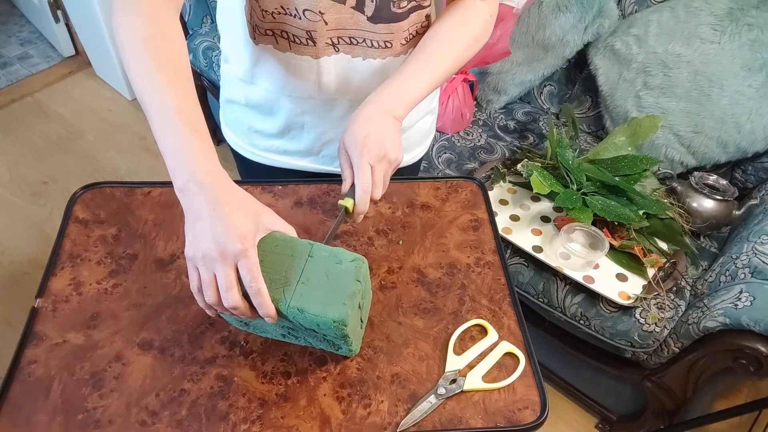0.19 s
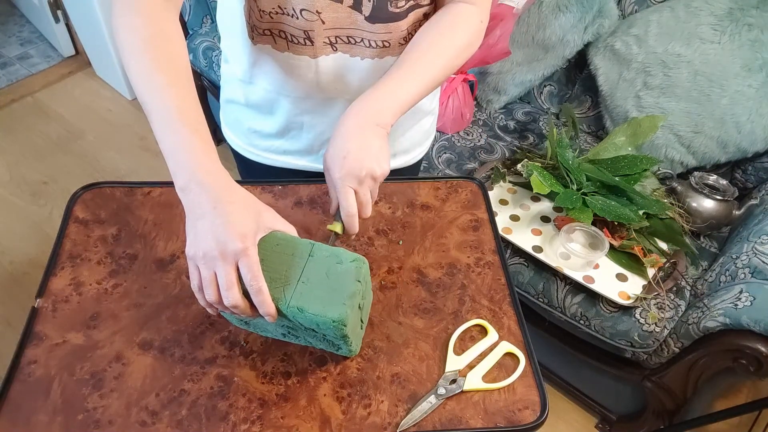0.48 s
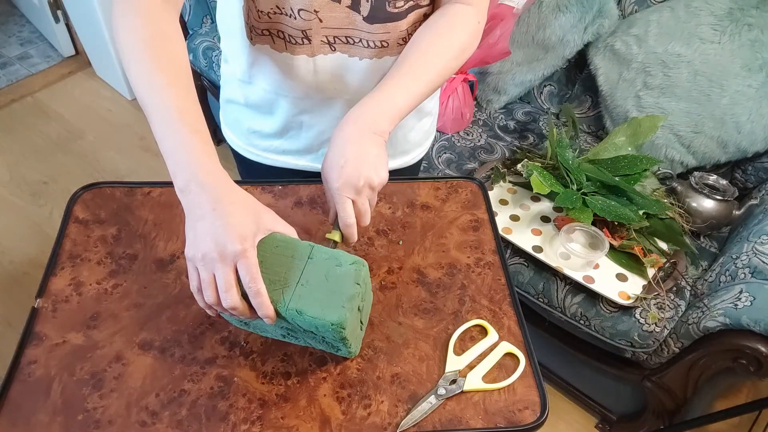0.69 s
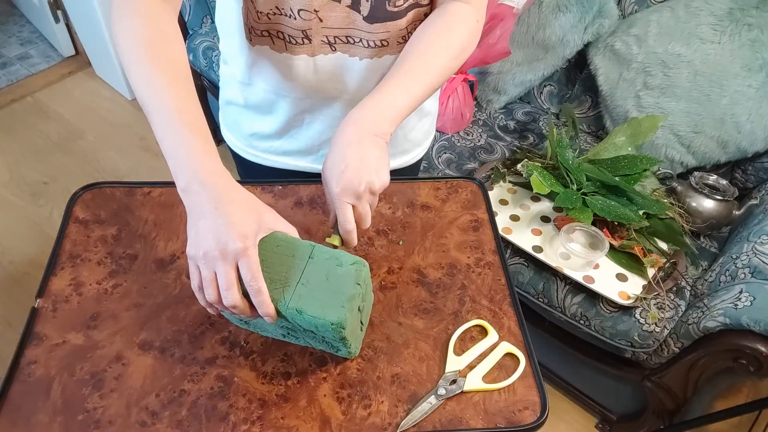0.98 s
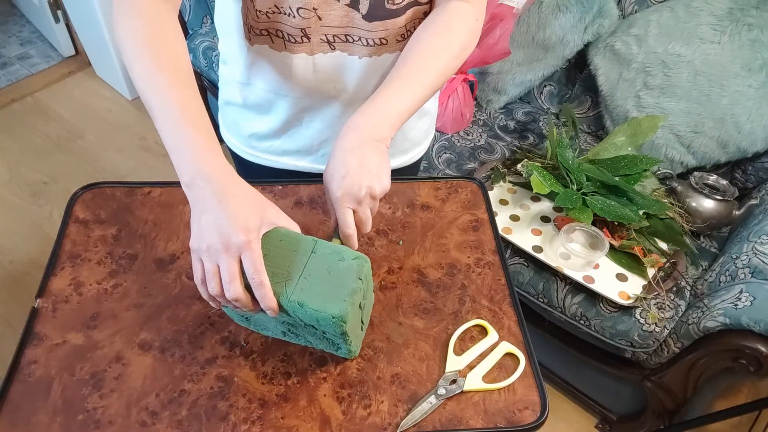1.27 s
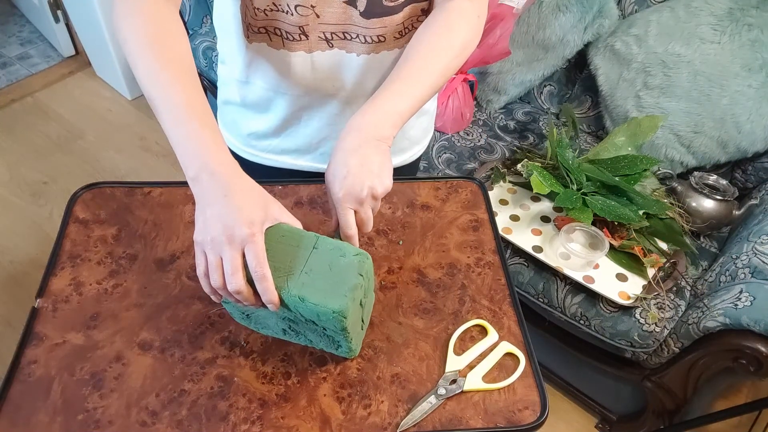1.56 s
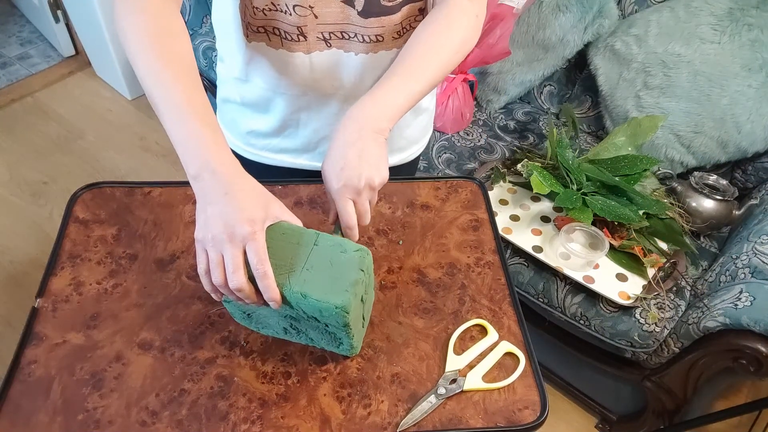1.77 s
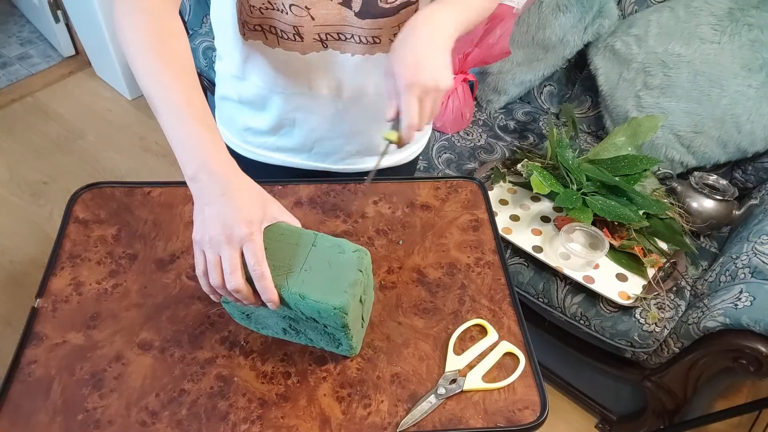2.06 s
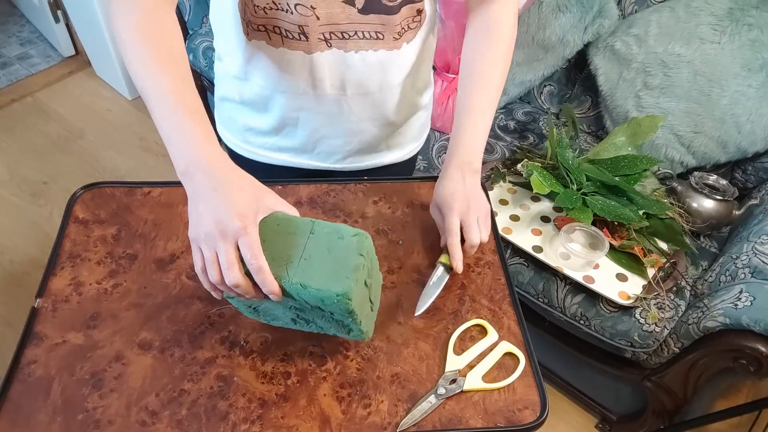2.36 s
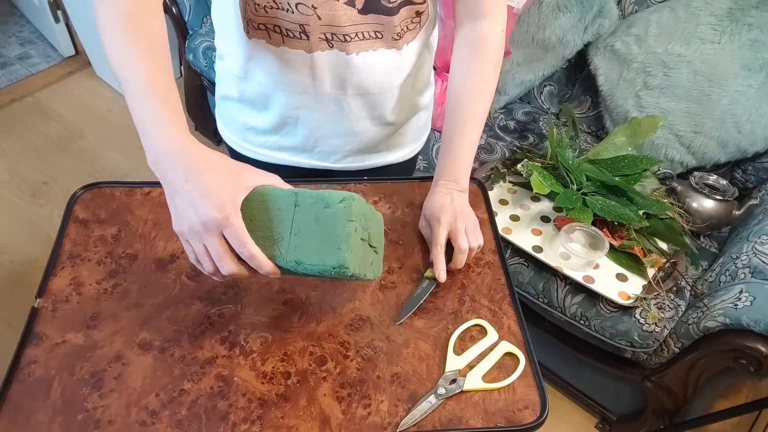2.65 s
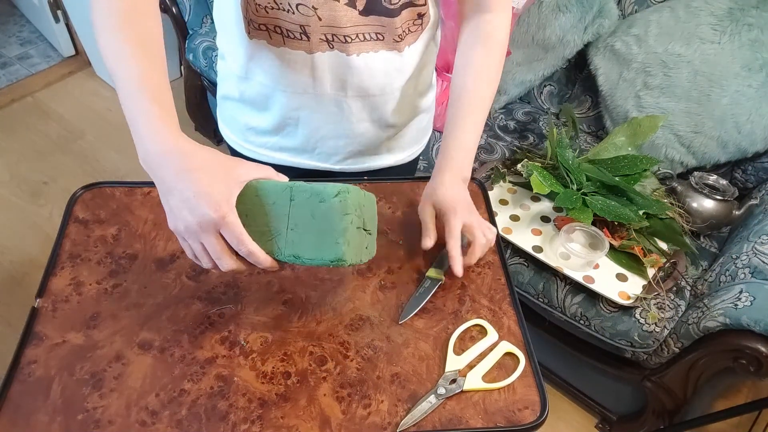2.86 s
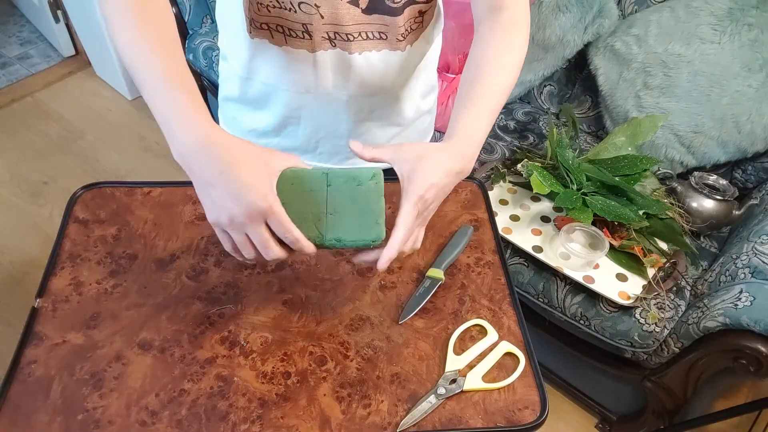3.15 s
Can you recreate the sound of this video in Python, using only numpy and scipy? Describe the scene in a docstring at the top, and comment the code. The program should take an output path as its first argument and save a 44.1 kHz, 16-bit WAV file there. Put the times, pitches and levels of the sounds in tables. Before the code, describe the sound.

Crisp, gritty rasping of a blade in brittle foam speeds up, ends in a hard crack on the table, then near quiet with soft bumps and a light brush, over low rumble and faint hiss indoors.

```python
"""Sawing dry foam

A knife saws through a dry foam block on a small table in a soft room, heard by a wide stereo microphone.
Brittle cells crush as dense random impulses; pressure drives resonances and rocking of the block. The blade
squeaks, breaks through and knocks the table, the knife is laid down and a finger brushes the foam: blows
excite decaying modes. A wall echo, a diffuse tail, low rumble and hiss surround the work."""
import sys
import numpy as np
from scipy import signal
from scipy.fft import rfft, irfft, next_fast_len
from scipy.io import wavfile
from scipy.ndimage import map_coordinates

SR = 44100
rng = np.random.default_rng(int(sys.argv[2]) if len(sys.argv) > 2 else 0)


def linear_from_db(decibels):
    """Turn decibels (scalar or array-like) into linear amplitude factors; 0 gives 1."""
    return 10 ** (np.asarray(decibels, float) / 20)


def bounce(signal):
    """Save signal as a 16-bit WAV file at the path given by the first command-line argument."""
    frames = np.transpose(np.atleast_2d(signal))
    limited = np.clip(frames, -1, 1)
    pcm = np.round(limited * 32767).astype(np.int16)
    wavfile.write(sys.argv[1], SR, pcm)


N = 145530  # samples
T = np.arange(N) / SR  # s

# Block rocking on the table: (frequency [Hz], bandwidth [Hz], relative level [dB])
ROCKING = [(267, 33, -9.5), (328, 24.3, -1.5), (365.6, 35, 1.5), (400, 29, 0), (432.7, 47, -3.5)]


def unit(x):
    """Normalization of mean power: the signal is brought to rms 1."""
    return x / np.sqrt(np.mean(x ** 2) + 1e-20)


def along(points, hz):
    """Interpolation of (frequency, value) points on a logarithmic frequency axis."""
    f, v = np.transpose(points)
    return np.interp(np.log(hz + 1), np.log(f + 1), v)


def wobble(rate):
    """Slow random modulation: a smooth curve through `rate` random knots a second."""
    knots = rng.standard_normal(int(N * rate / SR) + 4)
    return map_coordinates(knots, [T * rate])


def filtered(x, response):
    """Linear filtering: the spectrum is multiplied by a complex frequency response."""
    m = next_fast_len(x.shape[-1] + SR // 2)
    spectrum = rfft(x, m) * response(np.fft.rfftfreq(m, 1 / SR))
    return irfft(spectrum, m)[..., :x.shape[-1]]


def coloured(noise, points):
    """Spectral shaping of noise by (frequency, level) points."""
    return filtered(noise, lambda hz: linear_from_db(along(points, hz)))


def modes(peaks):
    """Superposition of damped resonators, alternating in sign, as one causal response."""
    def response(f):
        return sum((-1) ** k * linear_from_db(db) * 1j * f * width / (centre * centre - f * f + 1j * f * width)
                   for k, (centre, width, db) in enumerate(peaks))
    return response


def minimum_phase(points):
    """Minimum phase: folding the cepstrum gives a short causal impulse response of energy 1."""
    magnitude = linear_from_db(along(points, np.fft.rfftfreq(2048, 1 / SR)))
    cepstrum = irfft(np.log(magnitude + 1e-6))
    fold = np.r_[1, np.full(1023, 2), 1, np.zeros(1023)]
    h = irfft(np.exp(rfft(cepstrum * fold)))
    return h / np.linalg.norm(h)


def spread(pair, alike):
    """Interchannel coherence: two unrelated signals are mixed to a given left-right likeness."""
    def mid_side(hz):
        angle = np.arccos(np.clip(along(alike, hz), -1, 1)) / 2
        return np.array([np.cos(angle), np.sin(angle)])
    mid, side = filtered(pair, mid_side)
    return np.array([mid + side, mid - side])


def ports(x, lead):
    """Interchannel phase: one sound reaches both microphone ports, the left leading by lead(hz) radians."""
    return filtered(np.array([x, x]), lambda hz: np.exp(.5j * np.outer([1, -1], lead(hz))))


def cells():
    """Shot noise: foam cells burst at random moments with uneven sizes."""
    per_second, spread_db = 14000, 2.5
    hit = rng.random(N) < per_second / SR
    size = linear_from_db(spread_db * rng.exponential(size=N).clip(0, 3))
    return unit(hit * rng.standard_normal(N) * size)


def sawing():
    """Forced vibration: crushing cells rasp in the air and, under pressure, drive and rock the block."""
    # One list a stroke: (time [s], rasp level [dB], pressure into the table [dB])
    strokes = [
        [(0.0, -60.5, -7), (0.028, -61.5, -0.5), (0.274, -44, -19), (0.58, -46, -9), (0.65, -55.5, 14),
         (0.694, -52.5, -24), (0.745, -101, 17)],
        [(0.747, -45.5, 18), (0.751, -46.5, 2.5), (0.807, -42, -4.5), (0.867, -71, -8), (0.878, -57.5, 22.5)],
        [(0.8815, -35.5, 4.5), (0.887, -45.5, 2.5), (1.016, -45, 1.5), (1.048, -46.5, -1.5), (1.158, -51, 6),
         (1.216, -72, -36), (1.232, -71, 7)],
        [(1.2375, -37, 12.5), (1.246, -48.5, 1), (1.25, -35, 0.5), (1.262, -42, -8.5), (1.298, -47, 2.5),
         (1.415, -72, -13)],
        [(1.447, -55, 4), (1.458, -75, 4), (1.475, -55, 4), (1.513, -45, 8), (1.524, -64, -11)],
        [(1.548, -42.5, -11), (1.58, -49.5, -1.5), (1.762, -73, 14.5), (1.772, -63, -7)],
        [(1.775, -59, 2), (1.8, -53.5, 0), (1.825, -49.5, -23), (1.89, -53, -31), (1.955, -55, -33),
         (1.985, -54.5, -16), (2.021, -67, -27), (2.051, -73, -5), (2.09, -67, -1)],
        [(3.187, -52, -6), (3.191, -51, -33), (3.211, -64, -24), (3.22, -58, -8), (3.245, -76, -29),
         (3.271, -61, -25), (3.3, -85, -2)],
    ]
    # Colour of the crushed cells: (frequency [Hz], relative density [dB per Hz])
    rasp = [(120, -9.5), (200, -29), (358, -14), (446, -10), (743, -10), (925, -6.5), (1410, -1),
            (1690, -9), (1880, -3), (4430, -9.5), (5000, -7.5), (6100, -12.5), (7950, -7), (9030, -18),
            (13000, -8.5), (15600, -13.5)]
    # Resonances of the foam block: (frequency [Hz], bandwidth [Hz], relative level [dB])
    block = [(653, 117, 2.5), (1134, 460, -1.5), (1800, 410, 0.5), (2420, 210, -1), (2950, 490, -6)]
    block_db, block_follows = -1.5, 0.56  # dB over the rasp; dB per dB of pressure
    rock_db = -6.5  # dB over rasp plus pressure

    s, db, press = np.concatenate(strokes).T
    on = sum((T >= rows[0][0]) & (T < rows[-1][0]) for rows in strokes)
    level = np.interp(T, s, db)
    level = level + 1.27 * wobble(30.02) + 1.1 * wobble(70) + 0.93 * wobble(140)  # uneven cutting
    press = np.interp(T, s, press)

    def drive(db, response):
        reference = np.std(filtered(cells(), response))
        return filtered(cells() * on * linear_from_db(db), response) / reference

    def rocking(f):
        return modes(ROCKING)(f) * modes([(365, 250, 0)])(f)

    air = drive(level, lambda hz: linear_from_db(along(rasp, hz)))
    body = drive(level + block_db + block_follows * press, modes(block))
    return air + body + drive(level + rock_db + press, rocking)


def squeaks():
    """Narrow-band noise: brief rough whistles of the blade on the foam, under Gaussian envelopes."""
    # Whistles: (centre time [s], time from peak to 1/e [s], frequency [Hz], level [dB])
    whistles = [(0.245, 0.092, 1317, -56), (0.388, 0.07, 8000, -49.5), (0.406, 0.022, 6820, -52),
                (1.649, 0.0091, 1262, -45), (1.801, 0.0055, 1258, -47), (1.981, 0.015, 2050, -57.5),
                (2.44, 0.021, 1387, -68.5), (3.054, 0.047, 3190, -75)]
    width = .014  # bandwidth as a share of the pitch
    out = np.zeros(N)
    for s, half, hz, db in whistles:
        tone = unit(filtered(rng.standard_normal(N), modes([(hz, hz * width, 0)])))
        out += linear_from_db(db) * np.exp(-((T - s) / half) ** 2) * tone
    return out


def knocks(blows, rings):
    """Impact excitation: a chattering crack and decaying modes, low-passed by the blow's hardness."""
    # Colour of the crack: (frequency [Hz], relative density [dB per Hz])
    crack_colour = [(100, -22), (400, -12), (1000, -6), (3000, -3), (5500, -6), (8000, -4), (9500, -8),
                    (13000, 0), (16000, 0)]
    # One blow lands in a few contacts: (delay [s], relative level [dB])
    contacts = [(0, 0), (.0008, -2), (.0015, -3), (.0024, -6), (.004, -9)]
    vary_db, vary_phase = 1.5, .8  # spread of modes from blow to blow: dB, radians

    out, t = np.zeros(N + SR), T[:SR // 4]
    crack = minimum_phase(crack_colour)
    crack = crack / np.abs(crack).max()
    for s, db, hardness in blows:
        blow = np.zeros(len(t))
        for k, (f, width, peak) in enumerate(rings):
            louder, turn = rng.standard_normal(2)
            envelope = np.exp(-np.pi * width * t) - np.exp(-8 * f * t)  # decay less a fast onset
            ring = envelope * np.sin(2 * np.pi * f * t + vary_phase * turn)
            blow += (-1) ** k * linear_from_db(peak + vary_db * louder) * ring
        for k, (late, less) in enumerate(contacts):
            blow[round(late * SR):][:len(crack)] += (-1) ** k * linear_from_db(less) * crack
        blow = filtered(blow, lambda f: 1 / (1 + 1j * f / hardness) ** 2)
        out[round(s * SR):][:len(t)] += linear_from_db(db - 1.5) * blow
    return out[:N]


def nudges():
    """Transient excitation: decaying noise bursts, as soft shifts of the block, excite only its rocking."""
    # Soft contacts on the table: (time [s], relative level [dB])
    contacts = [(0.657, -59), (2.605, -50), (2.688, -43.5), (2.841, -41.5), (3.21, -47)]
    decay = 0.0046  # s, to 1/e
    push, t = np.zeros(N), T[:SR // 20]
    for s, db in contacts:
        burst = np.exp(-t / decay) * rng.standard_normal(len(t))
        push[round(s * SR):][:len(t)] += linear_from_db(db + 21.5) * burst
    return filtered(push, lambda f: modes(ROCKING)(f) * modes([(350, 200, 0)])(f))


def room(x):
    """Diffuse reverberation: each slice gets a fresh noise tail, each frequency decaying at its own speed."""
    # Reverberation time: (frequency [Hz], 60 dB decay time [s])
    decay = [(200, 0.3), (1000, 0.31), (4000, 0.27), (12000, 0.12)]
    # Coherence of the tail: (frequency [Hz], left-right likeness [-1 to 1])
    alike = [(60, 0.51), (180, 0.11), (550, -0.43), (1650, -0.55), (4970, -0.42), (15000, -0.47)]
    gap = round(.0015 * SR)  # 1.5 ms before the tail

    wet, step = np.zeros((2, N + 2 * SR)), SR // 10
    for i in range(0, N, step):
        hz, t, z = signal.stft(rng.standard_normal((2, SR // 2)), SR, nperseg=256)
        z = z * linear_from_db(-60 * t / along(decay, hz)[:, None])
        tail = signal.istft(z, SR, nperseg=256)[1]
        part = signal.fftconvolve(x[None, i:i + step], tail / np.linalg.norm(tail[0]), axes=1)
        wet[:, i + gap:][:, :part.shape[1]] += part
    return spread(wet[:, :N], alike)


def rumble():
    """Incoherent low-frequency noise: each port has its own rumble and slow level drift."""
    # Colour of the rumble: (frequency [Hz], relative density [dB per Hz])
    colour = [(2.4, -61), (4.0, 0), (22, -13.5), (30, -9.5), (38, -17), (76, -24.5), (134, -35),
              (250, -38.5), (320, -49), (550, -120)]
    level = np.array([[-40.5], [-43.5]])  # dB, left and right
    drift = 1.7 * np.array([wobble(3.05), wobble(3.28)])  # dB
    return unit(coloured(rng.standard_normal((2, N)), colour)) * linear_from_db(level + drift)


def hiss():
    """Partially coherent broadband noise: a nearly steady hiss."""
    # Colour of the hiss: (frequency [Hz], relative density [dB per Hz])
    colour = [(88, -32), (150, -5.5), (333, -6.5), (562, -14.5), (608, -16.5), (1610, -20.5), (1770, -27),
              (1950, -23), (6260, -37), (7900, -34.5), (8880, -45.5), (15600, -23)]
    # Coherence of the hiss: (frequency [Hz], left-right likeness, clipped to -1 to 1)
    alike = [(60, -1.5), (180, -1.11), (550, -0.6), (1650, -0.75), (4970, -0.076), (15000, -0.29)]
    noise = spread(coloured(rng.standard_normal((2, N)), colour), alike)
    return unit(noise) * linear_from_db(-56 + 0.27 * wobble(3.5))


def scene():
    """Superposition of paths: the work direct, knocks off one wall, all through the room, over the noise."""
    # Blade on block and table: (time [s], relative level [dB], low-pass hardness [Hz])
    blade_blows = [(.7495, -30, 2010), (.882, -29, 2490), (1.238, -30.5, 4000), (1.249, -26.5, 3000),
                   (1.419, -38, 3000), (1.4485, -32, 12000), (1.462, -34, 12000), (1.4745, -36, 12000),
                   (1.5357, -9.5, 15400), (1.800, -29.5, 710), (2.175, -52.5, 16200)]
    # Knife laid down: (time [s], relative level [dB], low-pass hardness [Hz])
    laid_blows = [(2.7579, -23, 5000), (2.7765, -27, 920)]
    # Table top, middle: (frequency [Hz], bandwidth [Hz], relative level [dB])
    table_middle = [(93, 72, -16), (244, 72, -20.5), (363, 44, -12.5), (540, 55, -14), (697, 170, -6),
                    (783, 62, -22.5), (865, 170, -14.5), (1054, 96, -5), (1337, 62, -9.5),
                    (1620, 240, -4.5), (2210, 390, -2.5), (3000, 880, 5.5), (5000, 1030, -3),
                    (7770, 620, -9)]
    # Table top, near the edge: (frequency [Hz], bandwidth [Hz], relative level [dB])
    table_edge = [(98, 41, -20.5), (230, 26, -16.5), (358, 22, -15.5), (593, 50, -3), (675, 55, -6.5),
                  (855, 107, -5), (1236, 180, -0.5), (1760, 250, 3.5), (2380, 260, -1), (2940, 400, -2),
                  (5000, 1600, -1), (6700, 730, -29)]
    # Phase of the direct rubbing sound: (frequency [Hz], lead of the left port [rad])
    rub_lead = [(100, 0.55), (350, 0.28), (1200, 1.94), (5800, 2.02), (8200, 4.35), (14000, 5.1)]
    # Balance of the ports: (frequency [Hz], left over right [dB])
    balance = [(60, 1), (250, 4.5), (1200, 0.5), (4500, 1), (6000, 5), (7200, 11.5), (8600, 5.5),
               (10500, 6), (15000, 2)]
    knock_lead, laid_lead = 0.00012, 0.000192  # s, the left port hears a blow first
    wall_delay, wall_db = 0.017, -13  # s, dB
    rub_room_db, knock_room_db = 3.5, 2

    rub = sawing() + squeaks() + nudges()
    struck = knocks(blade_blows, table_middle)
    laid = knocks(laid_blows, table_edge)
    direct_knocks = ports(struck, lambda hz: 2 * np.pi * hz * knock_lead)
    direct_knocks = direct_knocks + ports(laid, lambda hz: 2 * np.pi * hz * laid_lead)
    # the echo arrives with its sides swapped
    wall = linear_from_db(wall_db) * np.roll(direct_knocks[::-1], round(wall_delay * SR), axis=1)
    reverberant = room(linear_from_db(rub_room_db) * rub + linear_from_db(knock_room_db) * (struck + laid))
    work = ports(rub, lambda hz: along(rub_lead, hz)) + direct_knocks + wall + reverberant
    work = filtered(work, lambda hz: linear_from_db(np.outer([.5, -.5], along(balance, hz))))
    return work + rumble() + hiss()


def top_cut(x):
    """Nothing passes above the cut-off."""
    return signal.sosfilt(signal.butter(12, 16670, fs=SR, output="sos"), x)


def record(dry):
    """Band limitation: the mix is attenuated by 30 dB above the top frequency."""
    top = 15650  # Hz
    mix = filtered(dry, lambda hz: linear_from_db(-30 * (hz > top)))
    return top_cut(mix)


dry = scene()
out = record(dry)
bounce(out)
```